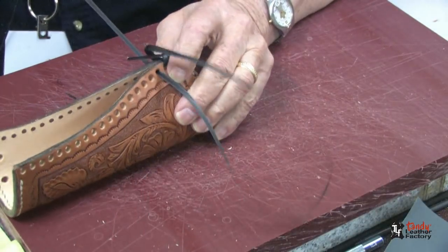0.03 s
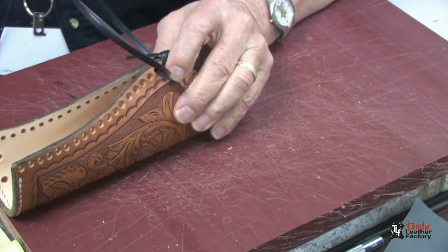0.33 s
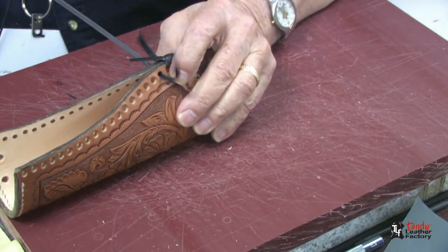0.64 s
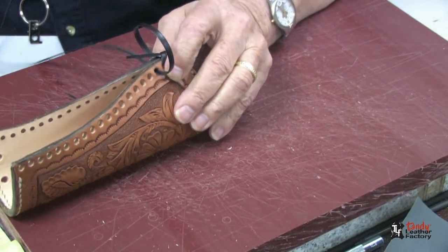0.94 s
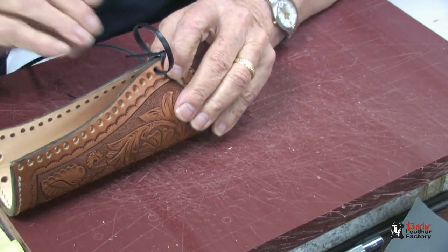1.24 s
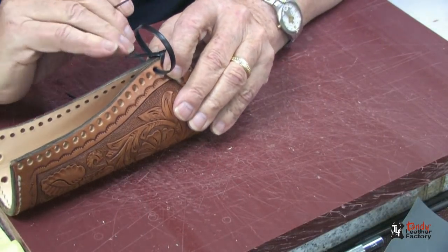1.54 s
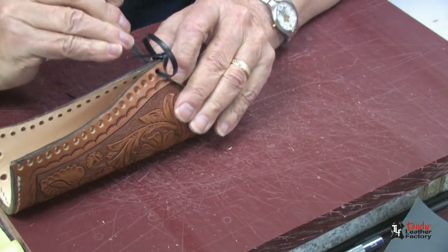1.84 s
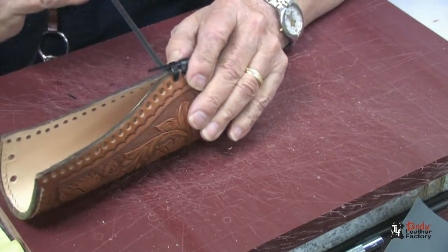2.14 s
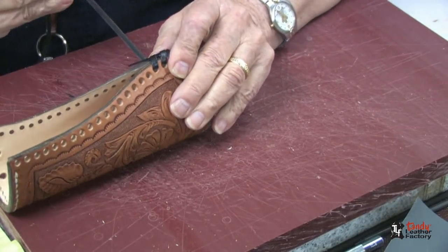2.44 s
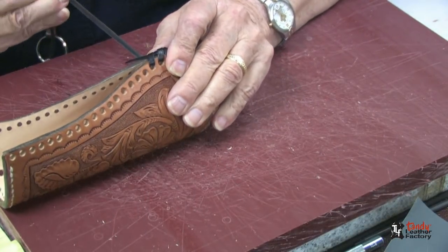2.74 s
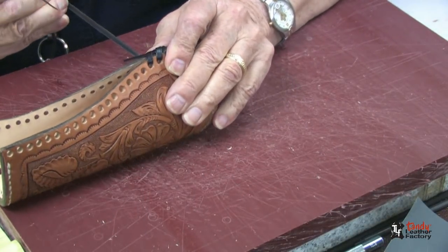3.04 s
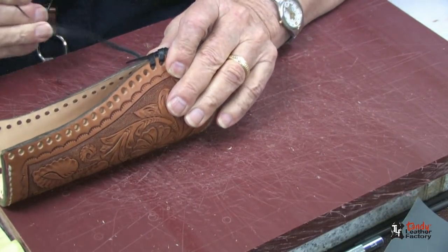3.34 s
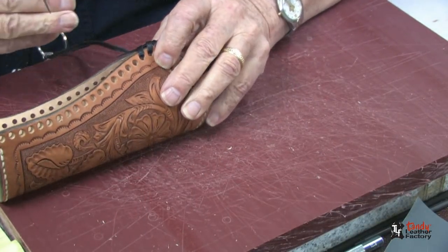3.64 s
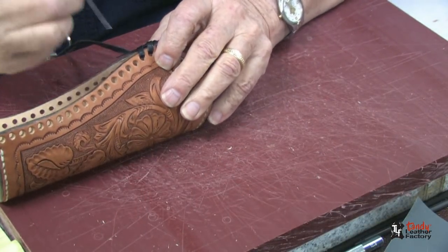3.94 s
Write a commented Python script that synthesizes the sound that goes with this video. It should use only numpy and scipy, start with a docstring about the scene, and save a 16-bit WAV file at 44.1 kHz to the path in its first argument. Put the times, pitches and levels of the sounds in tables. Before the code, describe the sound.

A leather lace rasps and hisses through a hole in a stiff sheath, snaps lightly, then is drawn through again, ending in a soft thud. Faint rubbing and ticks follow, close to the microphone in a quiet workshop.

```python
"""A rasp and a hiss: a leather lace is drawn through a punched hole in a stiff sheath, then drawn again.
Tiny slips of the lace ring the leather and hiss at the rim of the hole; the lace snaps free of a kink,
and the stitch seats with a soft thud. Hands rub and tick on the work over a low room hum.
Heard in mono, from one microphone close to the bench in a quiet workshop."""
import sys
import numpy as np
from scipy import signal
from scipy.fft import rfft, irfft
from scipy.io import wavfile

SR = 44100
rng = np.random.default_rng(int(sys.argv[2]) if len(sys.argv) > 2 else 0)


def wav_record(signal):
    """Record a signal, one row per channel, as 16-bit PCM in the file named by sys.argv[1]."""
    frames = np.transpose(np.atleast_2d(signal))
    bounded = np.clip(frames, -1, 1)
    # unit amplitude maps onto the largest positive 16-bit level
    quanta = np.round(bounded * 32767).astype(np.int16)
    wavfile.write(sys.argv[1], SR, quanta)


N = 176400  # 4 s


def amp(db):
    """Decibels to gain."""
    return 10 ** (np.asarray(db) / 20)


def unit(x):
    """Scale to an RMS of 1."""
    return x / np.sqrt(np.mean(x ** 2) + 1e-20)


def level(rows, column=1):
    """Gain along a curve of time_s, level_db; it fades fast from 30 ms beyond either end."""
    rows = np.array(rows)
    t = np.arange(N) / SR
    outside_s = np.maximum(rows[0, 0] - t - .03, 0) + np.maximum(t - rows[-1, 0] - .03, 0)
    return amp(np.interp(t, rows[:, 0], rows[:, column])) * np.exp(-outside_s / .005)


def add(mix, start_s, sound):
    """Mix a sound in at its start time."""
    part = mix[max(round(start_s * SR), 0):][:len(sound)]
    part += sound[:len(part)]


def colour(x, points):
    """Minimum-phase filter through points of frequency_hz, gain_db."""
    point_hz, db = np.transpose(points)
    hz = abs(np.fft.fftfreq(2 ** 13, 1 / SR))
    log_gain = np.log(amp(np.interp(np.log(hz + 1), np.log(point_hz + 1), db)))
    response = np.exp(np.conj(signal.hilbert(log_gain)))
    taps = np.fft.ifft(response).real[:2 ** 12]
    return signal.fftconvolve(x, taps)[:len(x)]


def ring(modes):
    """Response of damped modes to one tap, peak 1."""
    t = np.arange(SR // 5) / SR
    x = sum(amp(db - 60 * t / t60) * np.sin(2 * np.pi * hz * t) for hz, db, t60 in modes)
    return x / abs(x).max()


def narrow(hz, width_hz):
    """Noise in one narrow band: a wavering tone or, around 0 Hz, a random drift."""
    f = np.fft.rfftfreq(N, 1 / SR)
    band = np.exp(-2 * ((f - hz) / width_hz) ** 2)
    return unit(irfft(rfft(rng.standard_normal(N)) * band, N))


def burst(decay_s):
    """A very short puff of noise."""
    t = np.arange(SR // 20) / SR
    return rng.standard_normal(len(t)) * np.exp(-t / decay_s)


def slips(per_s, spread_db):
    """Friction: a random train of tiny slips of uneven size."""
    size = amp(spread_db * np.minimum(rng.exponential(1, N), 5))
    return unit(size * rng.choice([-1, 1], N) * (rng.random(N) < per_s / SR))


def room_tone(air_db=-50.5):
    """Ventilation rumble and wavering hum behind the work, with a low drone that dies away."""
    # spectrum of the ventilation: frequency_hz, gain_db
    air_colour = [(12, -52.5), (20, 0.5), (68, -.5), (113, -9.5), (168, -12.5), (337, -14), (422, -21.5),
                  (607, -29), (1220, -35.5), (4060, -48), (9140, -59), (14700, -48), (16000, -95)]
    # tones of the hum: pitch_hz, level_db, width_hz
    hum_tones = [(56.25, -50.5, 9), (122.1, -64, 3.5), (200, -69, 12), (289.7, -71.5, 3.7),
                 (463.6, -74, 3.9)]
    # fade of the drone: time_s, level_db
    drone_fade = [(0, -52), (.6, -55), (1.25, -62), (1.5, -86)]
    air = amp(air_db) * unit(colour(rng.standard_normal(N), air_colour))
    hum = sum(amp(db) * narrow(hz, width_hz) for hz, db, width_hz in hum_tones)
    drone = level(drone_fade) * narrow(hz=125.9, width_hz=4.6)
    return air + hum + drone


def workshop(direct, wet_db=-17, t60_s=.073, echoes_per_s=2500):
    """Close to the bench, the room adds only a faint short tail of sparse reflections."""
    t = np.arange(SR // 2) / SR
    echoes = rng.standard_normal(len(t)) * (rng.random(len(t)) < echoes_per_s / SR)
    tail = echoes * (t > .004) * amp(-60 * t / t60_s)
    return direct + amp(wet_db) * signal.fftconvolve(direct, tail / np.linalg.norm(tail))[:N]


def squeak(start_s=3.33, length_s=.06, from_hz=14700, to_hz=14300, waver_hz=60, peak_db=-63):
    """The lace squeaks: a faint whistle that sinks a little."""
    progress = np.clip((np.arange(N) / SR - start_s) / length_s, 0, 1)
    hz = from_hz + (to_hz - from_hz) * progress + waver_hz * narrow(0, waver_hz)
    return amp(peak_db) * np.sin(np.pi * progress) * np.sin(2 * np.pi * np.cumsum(hz) / SR)


def lace_brush():
    """Slack lace brushes the leather and rings it lightly."""
    # strength of the brushing: time_s, level_db
    strokes = [(.77, -83), (.82, -67), (.88, -71), (.935, -57.5), (1.05, -74), (1.3, -66), (1.6, -80),
               (2.2, -84), (2.33, -54), (2.45, -86), (2.58, -65), (2.64, -74), (2.74, -65), (2.85, -95),
               (3.01, -66), (3.12, -79), (3.55, -75), (3.58, -57.5), (3.6, -83), (3.685, -65), (3.76, -80)]
    return unit(leather(slips(per_s=1200, spread_db=5), low_cut_hz=1100)) * level(strokes)


def hand_rub():
    """Hands rub along the lace and the sheath in dense, fine slips."""
    # strength of the rubbing: time_s, level_db
    strokes = [(0, -54), (.85, -65.5), (1.08, -59.5), (1.42, -61), (1.65, -65), (2.25, -61.5),
               (2.34, -58.5), (2.51, -65), (2.6, -60.5), (2.75, -61), (2.88, -71), (2.97, -61.5),
               (3.07, -60), (3.15, -67.5), (3.4, -64), (3.6, -63), (4, -62.5)]
    # spectrum of skin on leather: frequency_hz, gain_db
    rub_colour = [(200, 1), (800, 7), (2400, 0.5), (4000, -3.5), (10000, -4.5), (13000, -11),
                  (16000, -16.5)]
    return unit(colour(slips(per_s=6000, spread_db=2), rub_colour)) * level(strokes)


def sheath_slide():
    """The sheath slides along the bench: one friction gives a dull scuff and a bright edge."""
    # course of the slide: time_s, scuff_db, treble_db
    slide = [(3.15, -70, -79), (3.21, -57, -68), (3.25, -54, -59), (3.29, -56.5, -58.5), (3.32, -60, -62.5),
             (3.355, -71, -55.5), (3.375, -59.5, -95), (3.42, -82, -93)]
    # spectra of the scuff and of its treble: frequency_hz, gain_db
    scuff_colour = [(250, -6), (550, -1.5), (850, 3.5), (1400, -6), (1900, -0.5), (2500, -7.5),
                    (3300, -13.5), (6000, -40)]
    treble_colour = [(2000, -28), (4000, -0.5), (8300, 5.5), (11500, -2), (14500, -3), (16000, -6)]
    drag = slips(per_s=4300, spread_db=1)
    scuff = unit(colour(drag, scuff_colour)) * level(slide)
    treble = unit(colour(drag, treble_colour)) * level(slide, column=2)
    return scuff + treble


def ticks():
    """Dry ticks of fingernail and lace edge, each a puff of noise in its own band."""
    # small contacts: start_s, peak_db, centre_hz, width_octaves, decay_s
    contacts = [(1.011, -42.5, 5350, 1, 0.0018), (1.367, -47, 10600, 0.11, 0.0034),
                (2.293, -48, 3010, 0.039, 0.0017), (2.818, -46.5, 5540, 1.3, 0.0014),
                (3.443, -38, 1350, 1.5, 0.0033), (3.463, -37, 5050, 0.87, .0012),
                (3.652, -44, 14500, .22, 0.0013)]
    out, f = np.zeros(N), np.geomspace(100, 20000, 200)
    for start_s, db, hz, octaves, decay_s in contacts:
        band_db = -20 * np.log10(1 + (np.log2(f / hz) / octaves) ** 2)
        tick = colour(burst(decay_s), np.column_stack([f, band_db]))
        add(out, start_s, amp(db) * tick / abs(tick).max())
    return out


def thuds(high_cut_hz=600, settle_db=-15, settle_s=.043):
    """Tugs on the lace knock the sheath softly on the bench, where it shuffles as it settles."""
    # knocks of the sheath: start_s, strength_db
    knocks = [(1.272, -38), (2.214, -35), (2.293, -29.5), (2.32, -36.5)]
    # modes of the bench: pitch_hz, gain_db, t60_s
    bench_modes = [(65.8, -8, 0.18), (138, -2.5, 0.049), (240, 10, 0.014), (363, -8, 0.062)]
    out, t = np.zeros(N), np.arange(SR // 4) / SR
    knock = ring(bench_modes)
    for start_s, db in knocks:
        shuffle = unit(signal.fftconvolve(rng.standard_normal(len(t)), knock)[:len(t)])
        add(out, start_s, -amp(db) * knock)
        add(out, start_s, amp(db + settle_db) * shuffle * np.exp(-t / settle_s))
    return signal.sosfilt(signal.butter(2, high_cut_hz, fs=SR, output="sos"), out)


def leather(force, low_cut_hz, tension=1):
    """The small leather wall rings, higher under a tauter lace, and radiates little bass."""
    # modes around the hole at tension 1: pitch_hz, gain_db, t60_s
    modes = [(1003, -7, 0.018), (1254, 5, 0.015), (1448, 4.5, 0.013), (2030, -6.5, 0.019),
             (2300, -17, 0.036), (3780, -15.5, .011)]
    wall = ring([(hz * tension, db, t60) for hz, db, t60 in modes])
    rung = signal.fftconvolve(force, wall)[:N]
    return signal.sosfilt(signal.butter(4, low_cut_hz, "high", fs=SR, output="sos"), rung)


def creaks():
    """The loop of lace bends and slips against the hole in single, higher catches."""
    # catches of the bending lace: start_s, strength_db
    catches = [(.7993, -45.5), (.863, -39), (.891, -40.5), (0.9144, -53)]
    taps = np.zeros(N)
    for start_s, db in catches:
        add(taps, start_s, amp([db]))
    return leather(taps, low_cut_hz=1100, tension=1.04)


def flicks(contact_s=.00007, bench_reflection_s=.00085, bench_reflection_db=-2.5):
    """The lace flips against the leather: a crack, and a short ring coloured by a bench reflection."""
    # blows of the lace: start_s, blow_db, crack_db
    blows = [(1.549, -41, -45.5), (1.7665, -20, -22), (1.8407, -33.5, -43), (2.295, -36, -44),
             (2.3197, -36.5, -57), (2.7158, -48.5, -57), (2.847, -41.5, -66), (2.9904, -32, -48),
             (3.569, -50, -45)]
    # spectrum of the crack: frequency_hz, gain_db
    crack_colour = [(500, -8), (2400, -5.5), (3200, -24), (4400, -13), (5300, -6.5), (6050, 1), (7100, -23),
                    (8200, -6.5), (10500, -10), (16000, -19)]
    taps, cracks = np.zeros(N), np.zeros(N)
    contact = np.arange(SR // 200) / SR / contact_s
    push = contact * np.exp(-contact)  # a longer contact makes a softer blow
    push /= push.sum()
    for start_s, blow_db, crack_db in blows:
        add(taps, start_s, amp(blow_db) * push)
        add(taps, start_s + bench_reflection_s, amp(blow_db + bench_reflection_db) * push)
        crack = colour(burst(decay_s=.00089), crack_colour)
        add(cracks, start_s, amp(crack_db) * crack / abs(crack).max())
    return leather(taps, low_cut_hz=790) + cracks


def twist(x, bands=14, swell_db=1.4, rate_hz=10.3):
    """As the lace twists in the hole, neighbouring bands swell and fade on their own."""
    f, spectrum = np.fft.rfftfreq(N, 1 / SR), rfft(x)
    centres_hz = np.geomspace(700, 15000, bands)
    parts = (irfft(spectrum * np.interp(f, centres_hz, band), N) for band in np.eye(bands))
    return sum(part * amp(swell_db * narrow(0, rate_hz)) for part in parts)


def flex(x, depth=.025, rate_hz=10.3):
    """The leather flexes under the pull, so its ring wanders in pitch."""
    speed = 1 + depth * narrow(0, rate_hz)
    return np.interp(np.cumsum(speed), np.arange(N), x)


def scrape(curve, from_hz=3910, rise_hz_per_s=2000, relative_db=-22):
    """A narrow scraping resonance at the rim climbs as the lace runs through."""
    hz = from_hz + rise_hz_per_s * np.arange(N) / SR
    tone = np.sin(2 * np.pi * np.cumsum(hz) / SR) * narrow(0, width_hz=220)
    return amp(relative_db) * unit(tone) * level(curve)


def pull(curve, hiss_colour, tension, judder_db=.07, judder_hz=88.5):
    """Lace runs through the hole: coarse catches ring the leather, fine slips hiss at the rim."""
    judder = amp(judder_db * narrow(0, judder_hz))
    catches = slips(per_s=2200, spread_db=1) * judder
    rasp = flex(leather(catches, low_cut_hz=750, tension=tension))
    fine_slips = slips(per_s=8300, spread_db=1.1) * judder
    hiss = colour(twist(fine_slips), hiss_colour)
    return unit(rasp) * level(curve) + unit(hiss) * level(curve, column=2)


def lacing():
    """Two pulls of the lace: the first with a narrow scrape riding on it, the second tauter."""
    # course of each pull: time_s, rasp_db, hiss_db
    first_pull = [(0, -41, -43), (.12, -42, -52.5), (.2, -43, -48.5), (.4, -44, -48), (.6, -47.5, -50.5),
                  (.645, -41.5, -45.5), (.738, -48, -52.5), (.762, -68, -81)]
    second_pull = [(1.8, -59.5, -67), (1.87, -48, -54), (1.92, -44, -52), (2.0, -44.5, -53),
                   (2.08, -42.5, -48.5), (2.15, -45.5, -47), (2.215, -48, -52.5), (2.235, -61.5, -80)]
    # spectrum of the hiss at the rim in each pull: frequency_hz, gain_db
    first_hiss = [(1600, -18), (2400, 3), (3100, -15), (3950, -5), (4700, -7), (6000, -0.5), (7600, -6),
                  (8700, -3), (9150, 2.5), (11000, 3), (16000, -10.5)]
    second_hiss = [(1500, -15), (3400, -29), (3800, -9.5), (4400, -11), (5300, -1.5), (6050, 2),
                   (6900, -7.5), (8300, -6), (9500, -0.5), (12000, -10), (16000, -17)]
    first = pull(first_pull, first_hiss, tension=.93) + scrape(first_pull)
    second = pull(second_pull, second_hiss, tension=.99)
    return first + second


def scene():
    """Lace, leather and hands close to the microphone, the room behind them."""
    work = lacing() + flicks() + creaks() + ticks() + thuds()
    handling = lace_brush() + hand_rub() + sheath_slide() + squeak()
    return (workshop(work + handling) + room_tone())[None]


def record(dry, edge_hz=15850):
    """The recorder's band limit."""
    low_pass = signal.firwin(511, edge_hz, window=("kaiser", 9), fs=SR)
    return signal.oaconvolve(dry, low_pass[None], "same")


dry = scene()
out = record(dry)
wav_record(out)
```